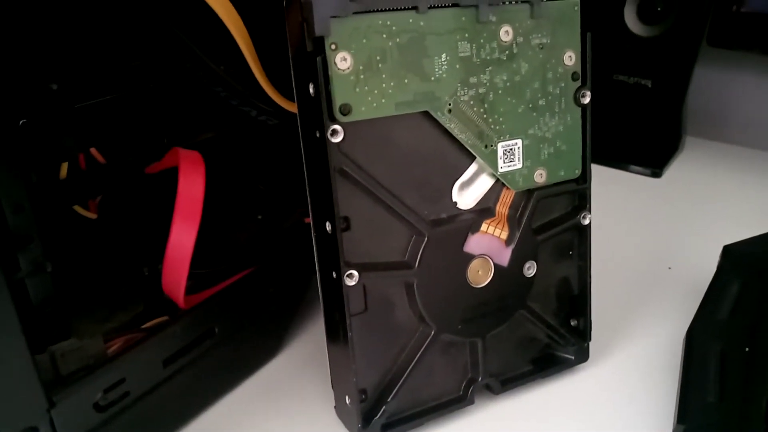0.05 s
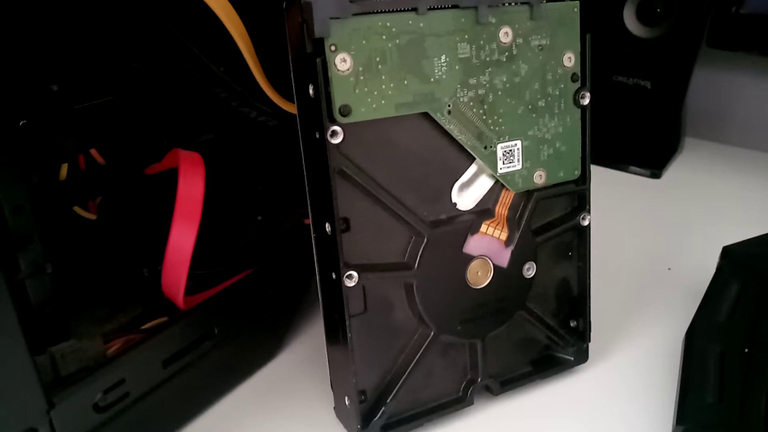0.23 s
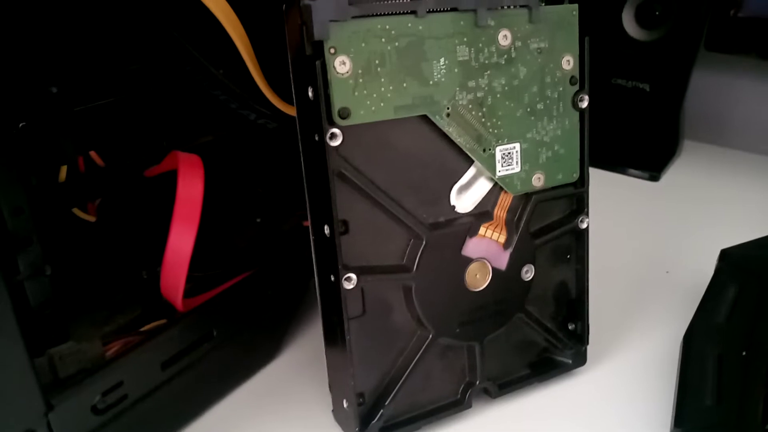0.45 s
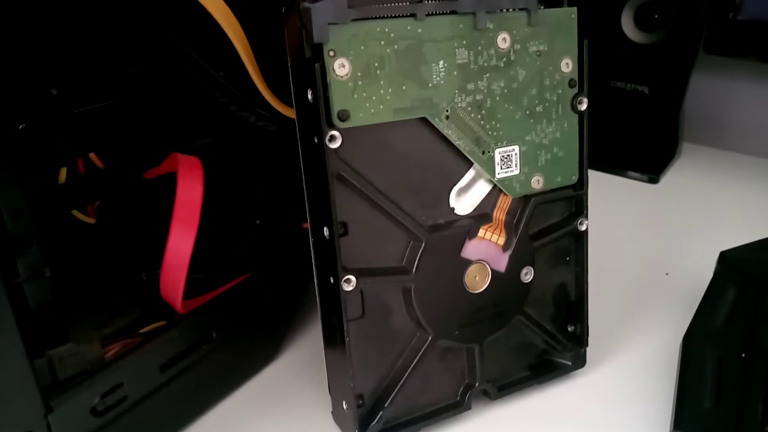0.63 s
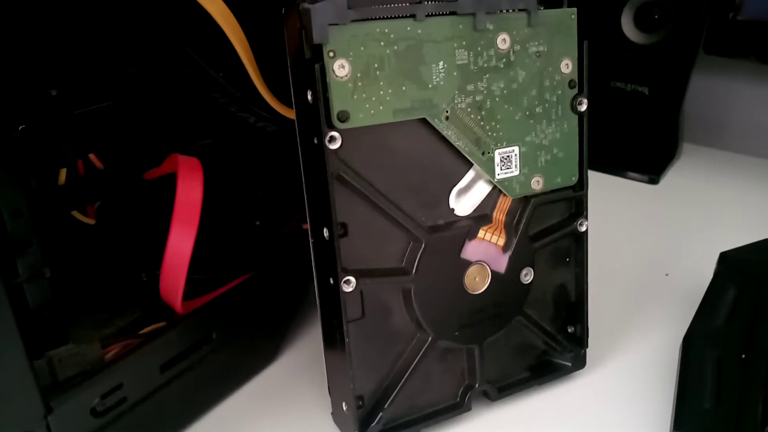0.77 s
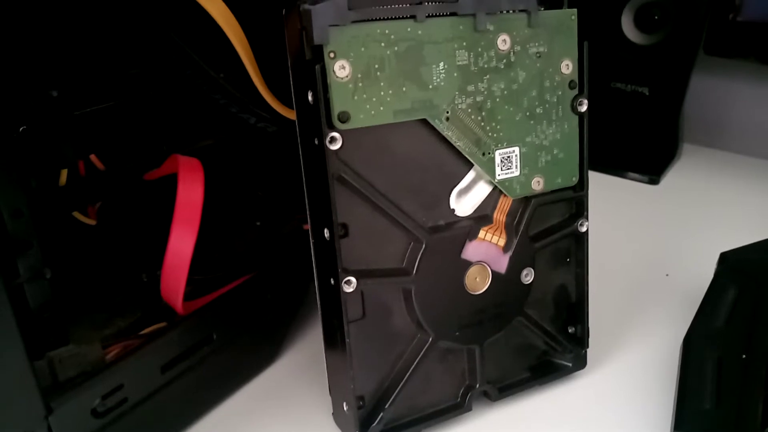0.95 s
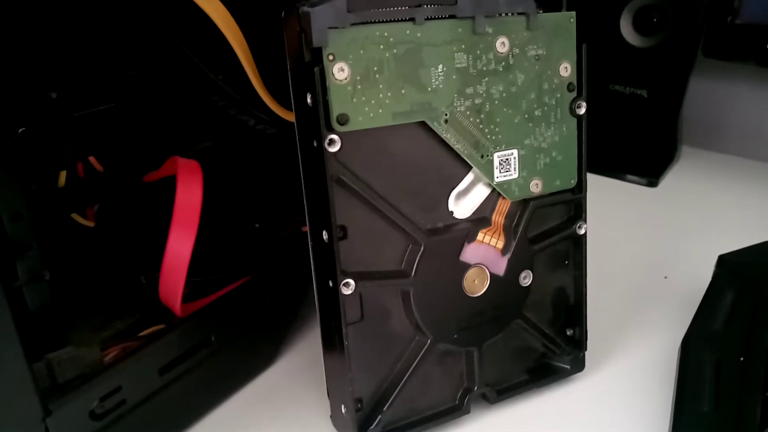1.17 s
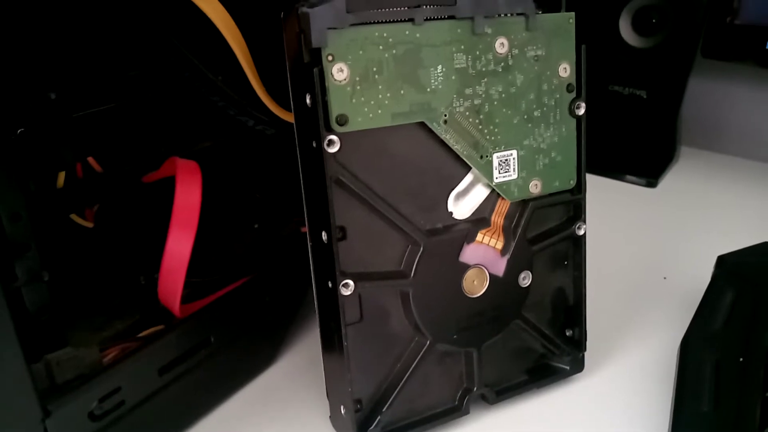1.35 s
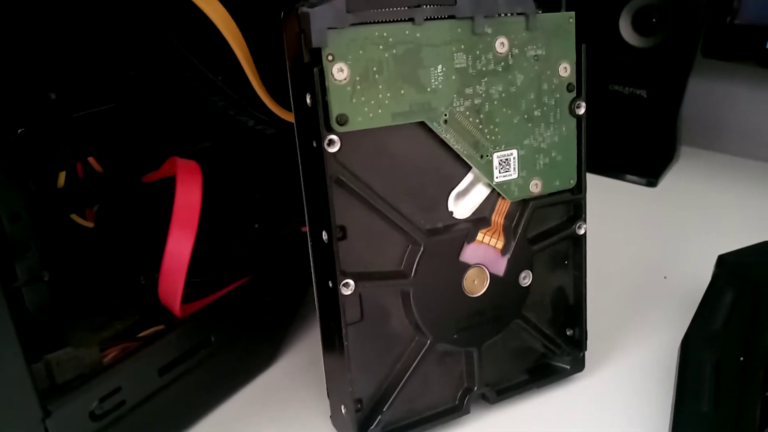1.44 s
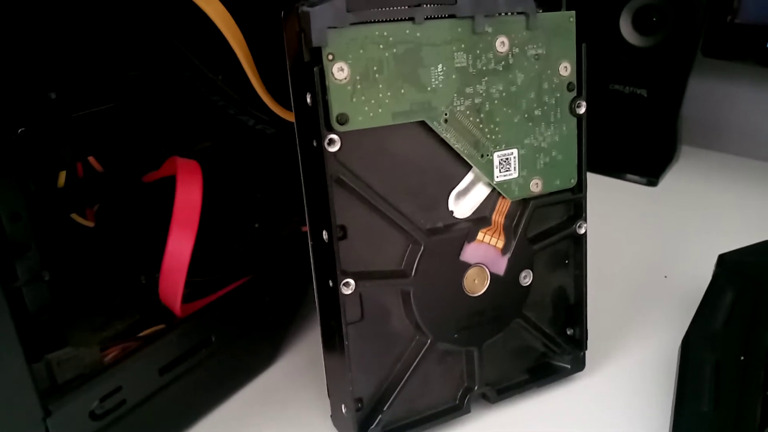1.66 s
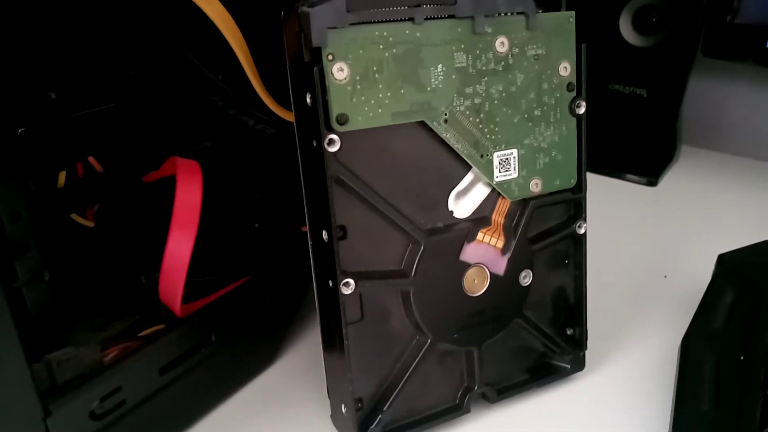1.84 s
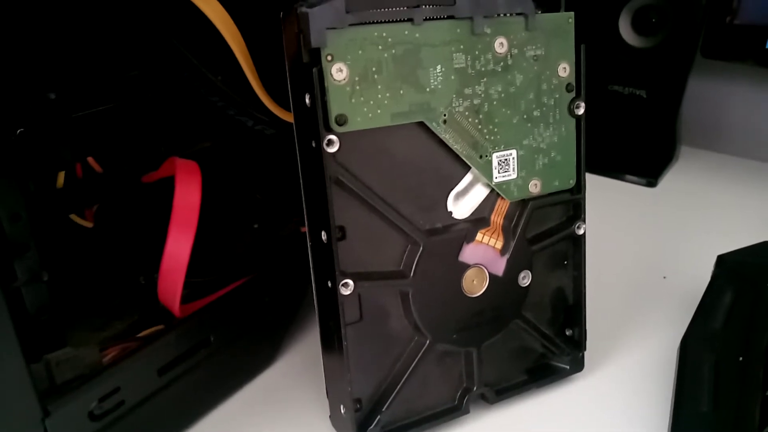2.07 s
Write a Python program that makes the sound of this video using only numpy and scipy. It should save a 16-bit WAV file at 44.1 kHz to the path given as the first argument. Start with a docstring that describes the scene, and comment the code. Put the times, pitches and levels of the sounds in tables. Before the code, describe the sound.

Failing hard drive humming quietly, broken by electrical pops, faint rattles and one metallic click.

```python
"""On a desk in a quiet room, a faulty hard drive hums close to the microphone as its disks spin.
Early on, sudden jumps in voltage make sharp electrical pops. Twice the arm that carries the read
heads chatters faintly in a pair of short bursts. Between these tries come a light tick and a harder
metallic click as the arm hits its stop, which shakes the casing."""
import sys
import numpy as np
from scipy import signal
from scipy.fft import rfft, irfft, next_fast_len
from scipy.io import wavfile
from scipy.ndimage import uniform_filter1d, map_coordinates

SR = 44100
rng = np.random.default_rng(int(sys.argv[2]) if len(sys.argv) > 2 else 0)


def log_audio(samples):
    """Write samples as a 16-bit WAV file to the path given in sys.argv[1]."""
    # one column per channel
    frames = np.atleast_2d(samples).T
    # limit to full scale, then quantise
    limited = np.clip(frames, -1, 1)
    pcm = np.round(limited * 32767).astype(np.int16)
    wavfile.write(sys.argv[1], SR, pcm)


N = 92610  # 2.1 s


def amp(db):
    """Turn decibels into a factor to multiply by."""
    return 10 ** (np.asarray(db) / 20)


def gain_by_pitch(points, hz):
    """Gain at each frequency, joining (f/Hz, level/dB) points on a log frequency axis."""
    point_hz, point_db = np.transpose(points)
    return amp(np.interp(np.log(hz + 1), np.log(point_hz + 1), point_db))


def gain_by_time(points):
    """Gain at each sample, joining (t/s, level/dB) points."""
    return amp(np.interp(np.arange(N) / SR, *np.transpose(points)))


def wobble(per_s):
    """A smooth curve through per_s random values a second."""
    values = rng.standard_normal(int(N * per_s / SR) + 4)
    return map_coordinates(values, [np.arange(N) * per_s / SR])


def filtered(x, response):
    """Scale each frequency in x by response(hz)."""
    size = next_fast_len(N + SR // 2)
    return irfft(rfft(x, size) * response(np.fft.rfftfreq(size, 1 / SR)), size)[:N]


def noise(density):
    """Noise whose strength at each frequency is density(hz), in amplitude per root Hz."""
    return filtered(rng.standard_normal(N), density) * np.sqrt(SR / 2)


def noise_band(hz, width_hz):
    """Noise gathered around one pitch."""
    return noise(lambda f: (1 + ((f - hz) / width_hz) ** 2) ** -2)


def unsteady_tone(hz, drift_hz):
    """A tone of rms level 1 whose pitch wanders a little."""
    cycles = rng.random() + np.cumsum(hz + drift_hz * wobble(14)) / SR
    return np.sqrt(2) * np.sin(2 * np.pi * cycles)


def flicker(x, depth_db=2.8):
    """Let small patches of the sound swell and fade at random, mostly in the midrange."""
    hz, _, spectrum = signal.stft(x, SR, nperseg=1024)
    patches = uniform_filter1d(rng.standard_normal(spectrum.shape), size=3, axis=0)  # blur over pitch
    patches = uniform_filter1d(patches, size=8, axis=1)  # blur over time
    swing_db = depth_db * np.interp(hz, [150, 400, 3000, 9000], [0, 1, 1, .3])
    gain = amp(swing_db[:, None] * patches / patches.std())
    return signal.istft(spectrum * gain, SR, nperseg=1024)[1][:N]


def room_air():
    """The air in the room gives a soft rumble and a fainter hiss."""
    air_levels = [(20, -96), (36, -98), (52, -79.5), (75, -89.5), (125, -91.5), (195, -94), (240, -103),
                  (450, -110), (1000, -112), (2700, -111), (3000, -118), (6500, -117), (12000, -116),
                  (15600, -119), (16100, -140)]  # room noise: f/Hz, level/dB per Hz
    return noise(lambda hz: gain_by_pitch(air_levels, hz))


def casing_whirr():
    """The spinning disks stir the casing, which whirrs at its own pitches, swelling and fading."""
    weak_bands = [(788, 70, -106), (1810, 150, -113)]  # weaker casing resonances: f/Hz, width/Hz, level/dB per Hz
    # how loud the three main resonances are: t/s, level/dB per Hz
    low_levels = [(.06, -105), (.14, -91), (.21, -106), (.30, -87.5), (.40, -103), (.60, -94), (.68, -106),
                  (1.08, -105), (1.17, -99), (1.24, -103), (1.44, -103), (1.52, -95.5), (1.58, -102),
                  (1.64, -93), (1.73, -102), (2.1, -102)]
    mid_levels = [(0, -99), (.18, -106), (.33, -102), (.5, -106), (.64, -98.5), (.76, -106), (.87, -102),
                  (.94, -93.5), (1.03, -109), (1.2, -101), (1.48, -109), (1.6, -100), (1.78, -106),
                  (2.1, -99.5)]
    high_levels = [(.04, -114), (.11, -104), (.24, -107), (.35, -101), (.46, -112), (.58, -103),
                   (.67, -114), (.84, -105), (.97, -102), (1.15, -113), (1.34, -101), (1.48, -113),
                   (1.56, -102), (1.63, -114), (1.8, -103), (1.9, -114), (1.98, -100), (2.1, -114)]
    weak = sum(amp(db + 3.2 * wobble(10.95)) * noise_band(hz, width) for hz, width, db in weak_bands)
    low = gain_by_time(low_levels) * noise_band(600.5, width_hz=94)
    mid = gain_by_time(mid_levels) * noise_band(1190, width_hz=136)
    high = gain_by_time(high_levels) * noise_band(2317, width_hz=162)
    return weak + low + mid + high


def spindle():
    """The disks hum at the rate they turn, and their motor adds faint higher tones."""
    hum_levels = [(0, -48), (.08, -50.5), (.105, -54), (.15, -50), (.19, -53.5), (.3, -49), (1.3, -48.5),
                  (2.1, -48.5)]  # how loud the hum is: t/s, level/dB
    motor_tones = [(807, -91), (1217, -90), (2396, -86), (6374, -102), (10546, -88)]  # tones of the motor: f/Hz, level/dB
    hum = gain_by_time(hum_levels) * unsteady_tone(89.6, drift_hz=0.27)
    motor = sum(amp(db + 2.9 * wobble(6.47)) * unsteady_tone(hz, drift_hz=7.5) for hz, db in motor_tones)
    return hum + motor


def whine(fade_s=0.015):
    """A thin, hissy whine is heard for about the first tenth of a second."""
    bands = [(5770, 56, -97, 0.11), (9254, 60, -99, 0.095), (9700, 69, -94.5, 0.082),
             (11400, 99, -89.5, 0.087), (12780, 70, -85, .06), (14500, 3100, -106, .08)]  # bands of hiss: f/Hz, width/Hz, level/dB per Hz, end/s
    t = np.arange(N) / SR
    return sum(amp(db) * noise_band(hz, width) * np.clip((end - t) / fade_s, 0, 1)
               for hz, width, db, end in bands)


def strikes(events, modes, rise_s, crack_db, room_db):
    """Each hit cracks, makes the part ring at its own pitches (modes) and echoes in the room."""
    crack_fade_s, room_fade_s = 0.008, 0.18  # time to fall by 60 dB
    out = np.zeros(N + SR)
    t = np.arange(SR // 3) / SR
    soften = signal.butter(2, 7560, fs=SR, output='sos')  # soft hits crack little above this pitch
    for start, db in events:
        ring = sum(amp(mode_db + rng.normal(0, 1) - 60 * t / fade_s)
                   * np.sin(2 * np.pi * (hz * t + rng.random())) for hz, mode_db, fade_s in modes)
        crack = amp(crack_db - 60 * t / crack_fade_s) * signal.sosfilt(soften, rng.standard_normal(len(t)))
        hit = (ring + crack) * (1 - np.exp(-t / rise_s))
        room = rng.standard_normal(len(t)) * amp(-60 * t / room_fade_s) * (1 - np.exp(-t / 0.0016))
        echo = signal.fftconvolve(hit, room / np.linalg.norm(room))[:len(t)]
        out[int(start * SR):][:len(t)] += amp(db) * (hit + amp(room_db) * echo)
    return out[:N]


def arm_chatter():
    """The head arm rattles, ringing faintly at each contact."""
    contacts = [(.386, -66), (.3925, -58.5), (.4048, -53.5), (.414, -73), (.4815, -65.5), (.4855, -61),
                (.4905, -58.5), (.498, -62), (.5255, -68.5), (1.5125, -66), (1.5192, -57.5), (1.5312, -52),
                (1.540, -71), (1.549, -84), (1.6075, -59.5), (1.6115, -56.5), (1.6225, -59), (1.627, -59.5),
                (1.660, -75), (1.670, -65)]  # contacts of the arm: t/s, level/dB
    modes = [(3896, 3.5, 0.015), (4040, -1, 0.031), (4380, -3.5, 0.015), (6130, -15, 0.025),
             (6800, -7.5, 0.016), (7780, -1.5, 0.012)]  # ringing of the arm: f/Hz, level/dB, time to fall 60 dB/s
    return strikes(contacts, modes, rise_s=0.00064, crack_db=-6, room_db=-4)


def light_tick():
    """Three tiny contacts run together into one bright tick."""
    contacts = [(1.2328, -50), (1.2345, -56.5), (1.2425, -61)]  # light contacts: t/s, level/dB
    modes = [(5120, -9, 0.054), (5600, 0, 0.023), (6500, -4, .012), (6960, 9.5, 0.018), (7670, 5, .012)]  # ringing of the tick: f/Hz, level/dB, time to fall 60 dB/s
    return strikes(contacts, modes, rise_s=0.00078, crack_db=-12, room_db=-2)


def casing_thud(start_s=1.298, rise_s=0.0027):
    """The casing rocks briefly after the arm's hardest hit."""
    modes = [(129, -46.5, 0.27), (323, -54, 0.095)]  # low ringing of the casing: f/Hz, level/dB, time to fall 60 dB/s
    t = np.maximum(np.arange(N) / SR - start_s, 0)
    ring = sum(amp(db - 60 * t / fade_s) * np.sin(2 * np.pi * hz * t) for hz, db, fade_s in modes)
    return ring * (1 - np.exp(-t / rise_s))


def hard_click():
    """The arm hits its stop four times in quick succession, making one metallic click."""
    hits = [(1.2811, -42.5, 0.0012), (1.2872, -49, 0.0025), (1.2977, -35.5, 0.0001),
            (1.304, -42.5, 0.00075)]  # hits on the stop: t/s, level/dB, rise/s
    modes = [(1280, -20, 0.016), (2180, -21.5, 0.014), (3145, -14.5, 0.012), (3950, -16.5, 0.029),
             (5000, -23, 0.026), (5790, -9, 0.012), (6110, -8, 0.016), (6750, 1.5, .011), (6970, -11, .01),
             (7600, -7, 0.0044), (11050, -21, 0.011)]  # ringing of the stop: f/Hz, level/dB, time to fall 60 dB/s
    return sum(strikes([(start, db)], modes, rise_s, crack_db=-16, room_db=-0.5)
               for start, db, rise_s in hits)


def electrical_pops(coupling_hz=99, blocking_hz=27):
    """The voltage jumps, and two filters that block slow changes pull it back to zero."""
    jumps = [(0.2218, -8), (0.2409, -6), (0.2445, -18)]  # voltage jumps: t/s, height/dB
    steps = sum(amp(db) * (np.arange(N) >= start * SR) for start, db in jumps)
    pulses = signal.sosfilt(signal.butter(3, coupling_hz, 'high', fs=SR, output='sos'), steps)
    return signal.sosfilt(signal.butter(2, blocking_hz, 'high', fs=SR, output='sos'), pulses)


def scene():
    """The drive, the room and the pops together in one channel."""
    knocks = hard_click() + casing_thud() + arm_chatter() + light_tick()
    background = spindle() + whine() + flicker(casing_whirr() + room_air())
    return (background + knocks + electrical_pops())[None]


def record(dry):
    """The microphone dulls part of the upper treble and picks up nothing above top_hz."""
    mic_levels = [(100, -1), (6450, -0.5), (7100, -3), (7850, -13.5), (13700, -14), (14700, -2.5),
                  (15800, -2), (16500, -13), (16950, -36)]  # tone colour of the microphone: f/Hz, level/dB
    top_hz = 16950
    return np.array([filtered(x, lambda hz: gain_by_pitch(mic_levels, hz) * (hz < top_hz)) for x in dry])


dry = scene()
out = record(dry)
log_audio(out)
```